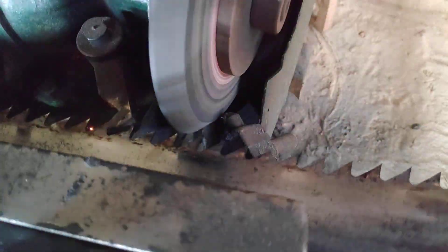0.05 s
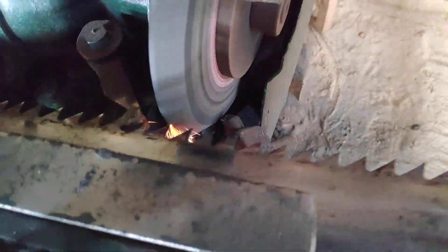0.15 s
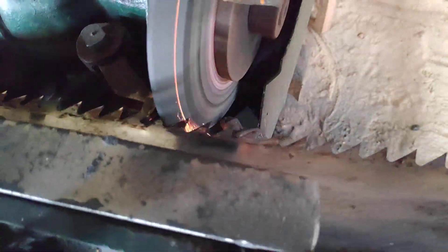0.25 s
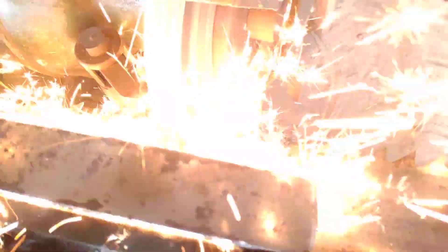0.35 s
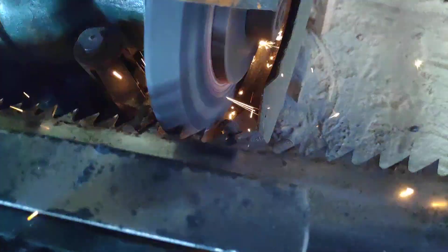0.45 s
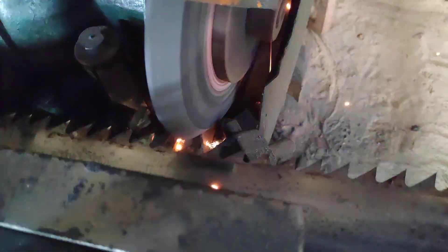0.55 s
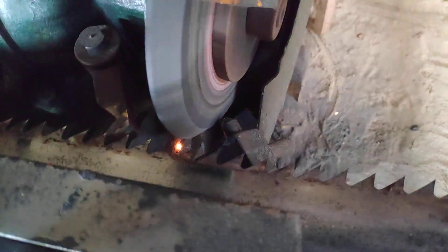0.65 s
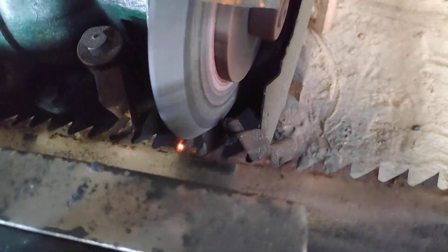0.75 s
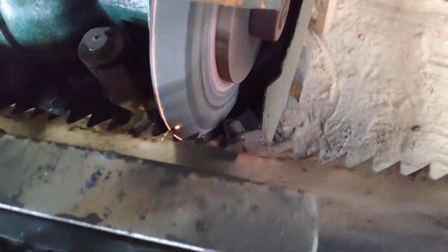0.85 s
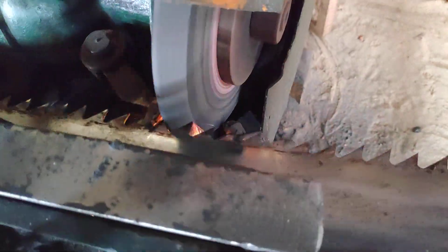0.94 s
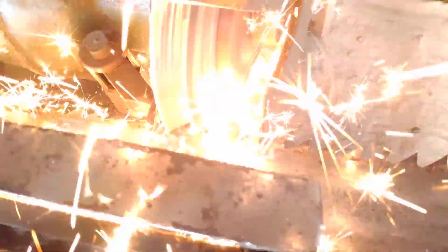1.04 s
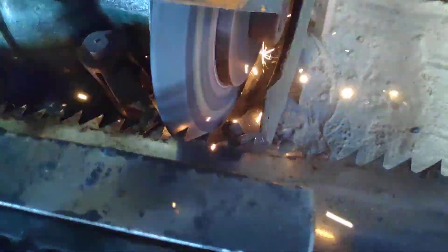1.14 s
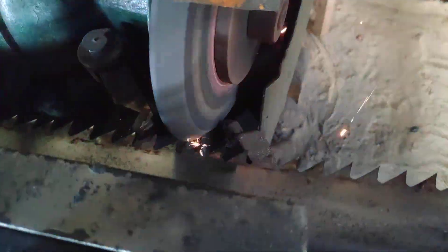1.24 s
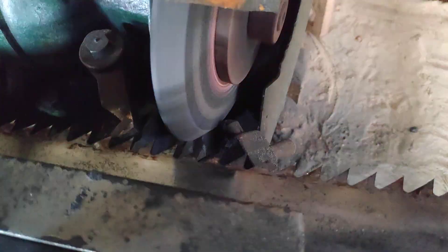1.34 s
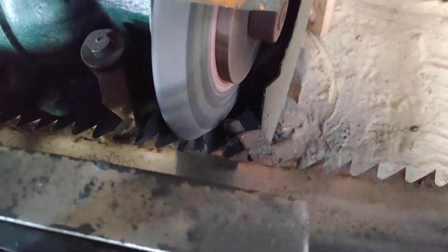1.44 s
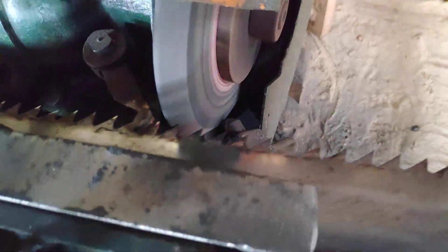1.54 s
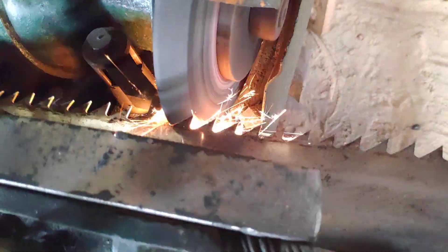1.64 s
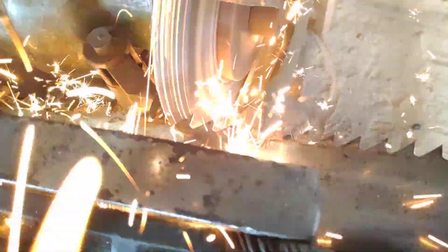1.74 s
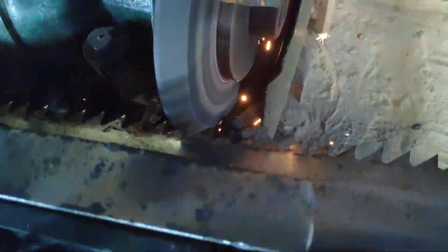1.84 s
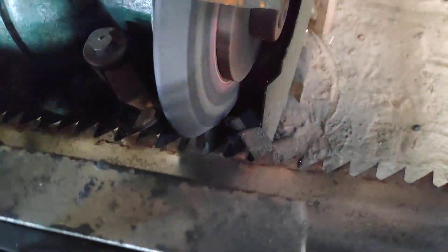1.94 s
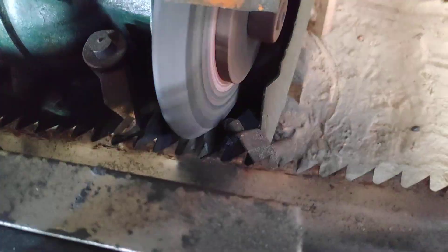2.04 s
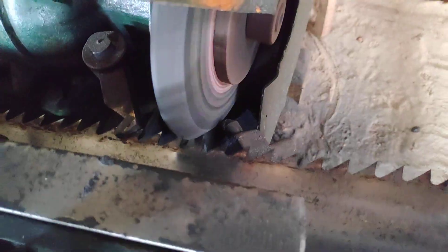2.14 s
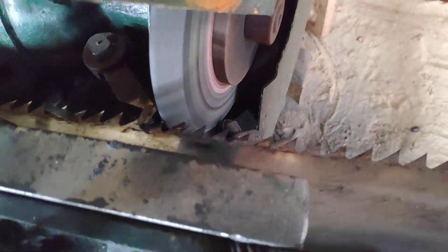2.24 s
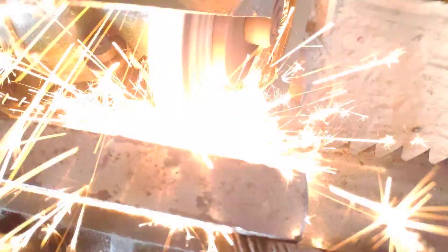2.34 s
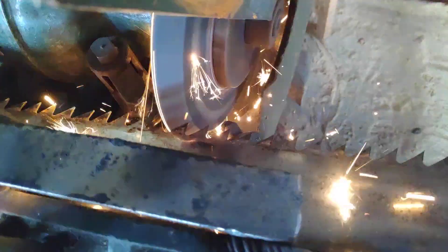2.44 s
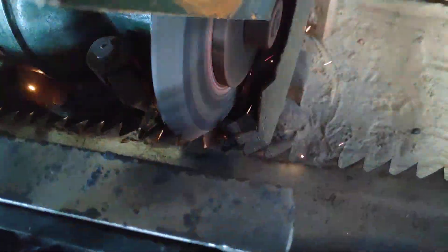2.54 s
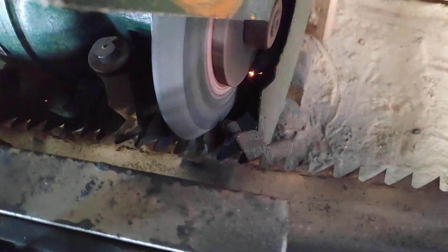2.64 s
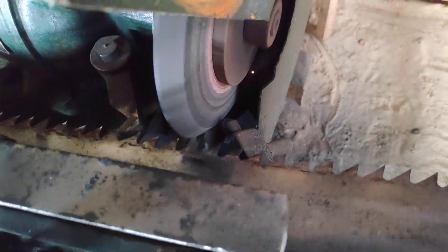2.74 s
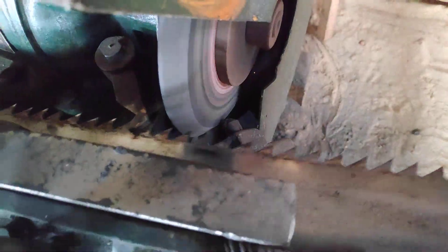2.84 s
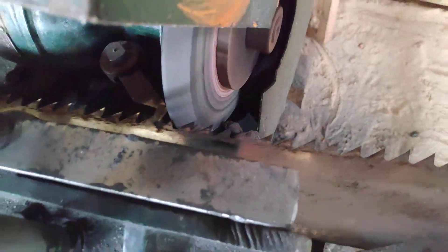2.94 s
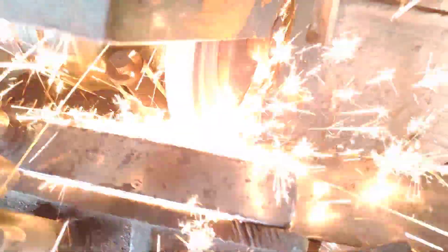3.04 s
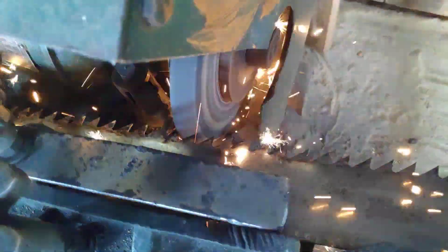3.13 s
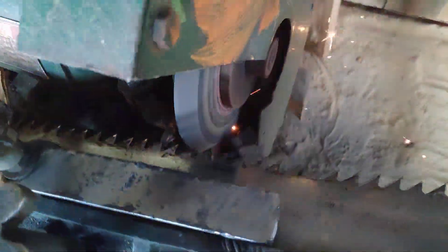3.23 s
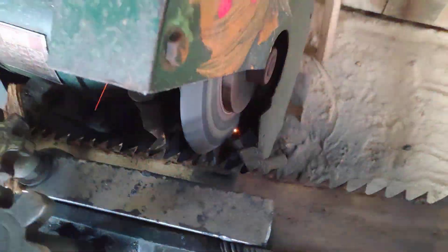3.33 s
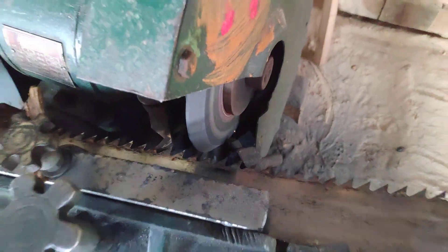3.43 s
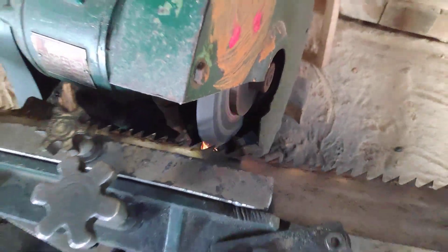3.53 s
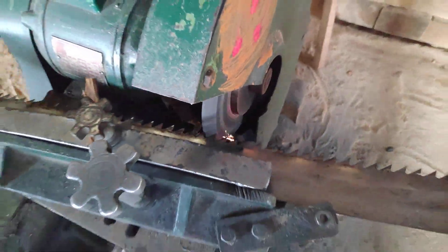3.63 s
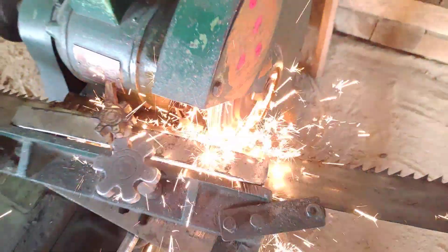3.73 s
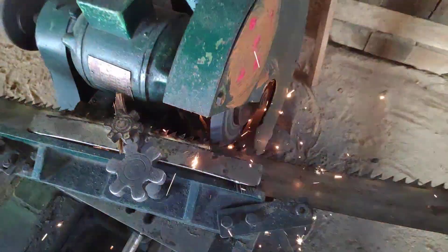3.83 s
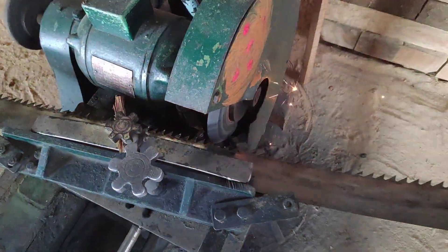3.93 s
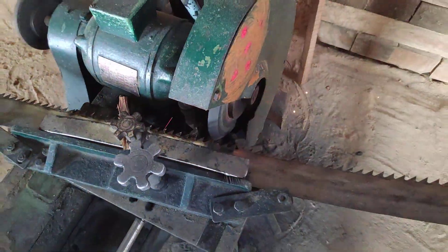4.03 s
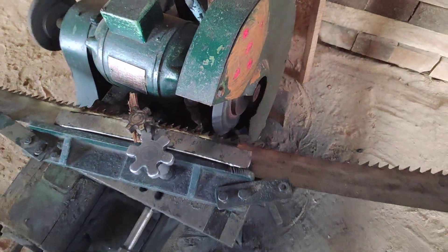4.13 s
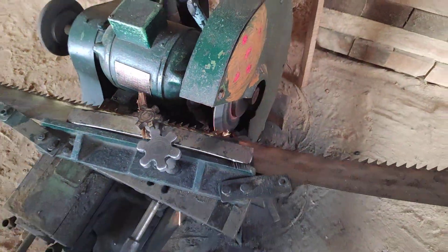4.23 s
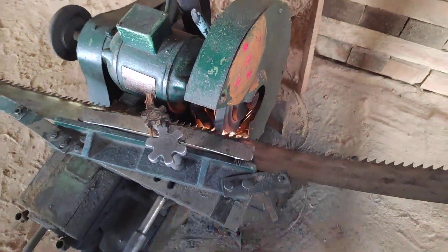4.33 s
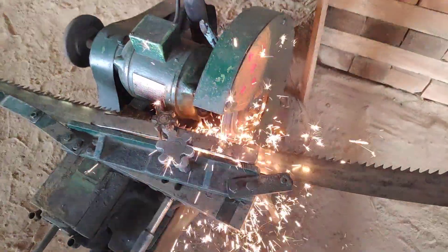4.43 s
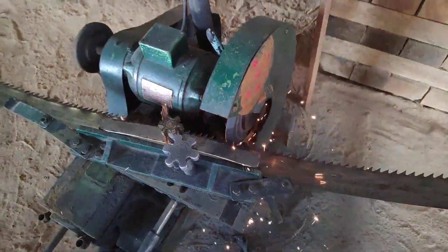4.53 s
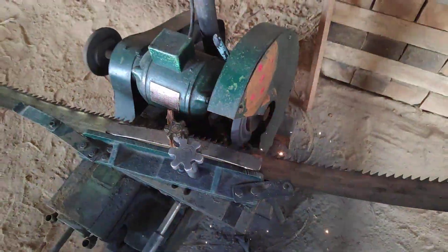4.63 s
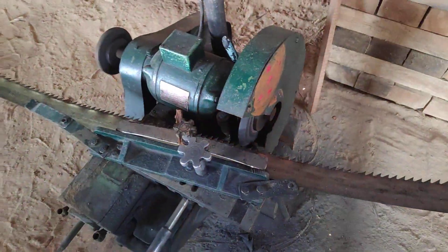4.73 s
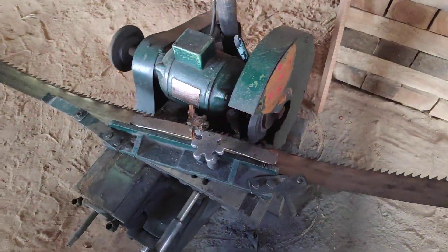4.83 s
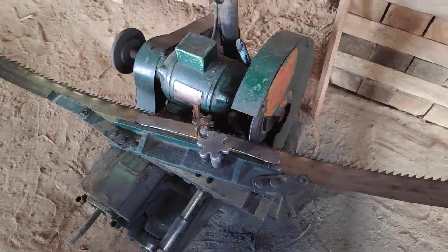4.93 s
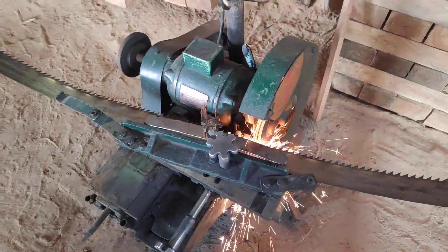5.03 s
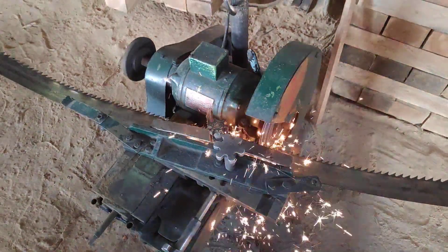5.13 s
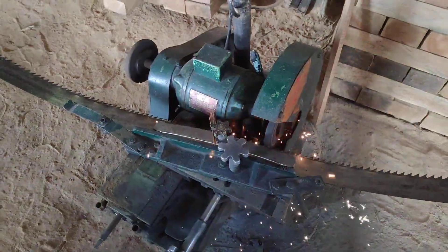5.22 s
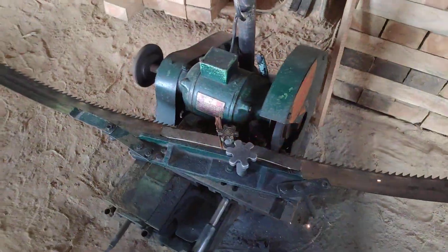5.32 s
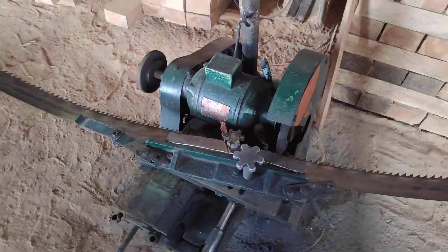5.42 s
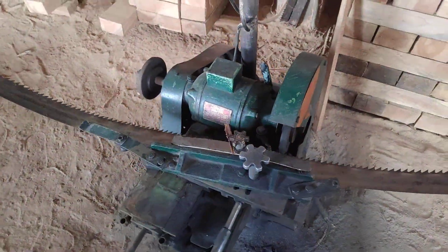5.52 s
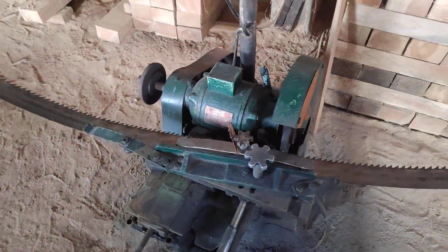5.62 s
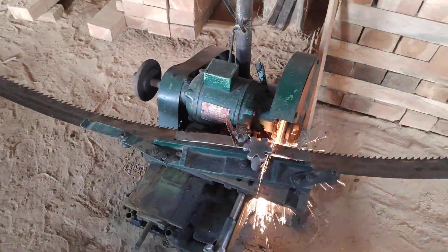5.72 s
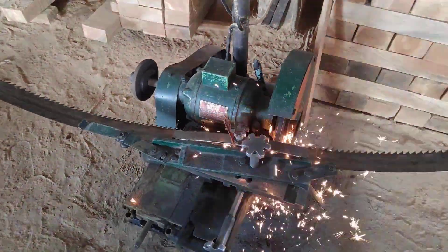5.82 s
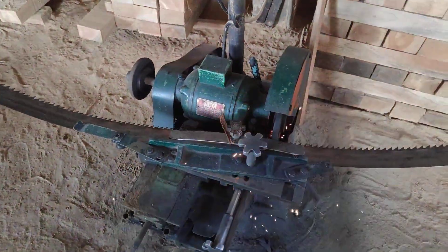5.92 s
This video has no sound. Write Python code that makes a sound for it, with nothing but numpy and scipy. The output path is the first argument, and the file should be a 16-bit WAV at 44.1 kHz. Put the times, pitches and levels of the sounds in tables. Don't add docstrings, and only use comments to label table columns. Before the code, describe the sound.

A grinding machine works tooth by tooth: bright steel clack, small clamp ticks, a tearing burst of abrasive noise, a dull brief echo, faint singing steel, then another click. Motor hum and rattling gears continue underneath. The phone's stereo image shifts as it retreats and turns; sound is close, rough and clipped, with ducked gain and low thumpy baseline swings, growing somewhat quieter.

```python
import sys
import numpy as np
from scipy import signal
from scipy.fft import rfft, irfft, next_fast_len
from scipy.io import wavfile
from scipy.ndimage import uniform_filter1d

SR = 44100
rng = np.random.default_rng(int(sys.argv[2]) if len(sys.argv) > 2 else 0)


def digitize_waveform(pressure):
    field = np.atleast_2d(pressure).T
    bounded = np.clip(field, -1, 1)
    quanta = np.round(bounded * 32767).astype(np.int16)
    wavfile.write(sys.argv[1], SR, quanta)


def nominal_scale(level):
    x = np.asarray(level, float) / 20
    return 10 ** x


N = 263277
T = np.arange(N) / SR
F = np.maximum(np.fft.rfftfreq(next_fast_len(N), 1 / SR), 1)

# [t/s, hiss level/dB, deepest cut after/s, contact/s, left port load/dB]
BITES = [
    (0.338, -4.5, 0.038, 0.085, -5),
    (1.018, -3.5, 0.029, 0.082, -2.5),
    (1.694, -2, 0.038, 0.085, -6.5),
    (2.371, -4.5, 0.035, 0.08, -4.5),
    (3.047, -6, 0.024, 0.08, -3),
    (3.729, -4, 0.038, 0.07, -3.5),
    (4.409, -6, 0.029, 0.067, -5),
    (5.084, -6.5, .04, 0.084, -32),
    (5.765, -8, .05, 0.083, -40),
]
# [t/s, distance loss/dB, left port aim/dB, left minus right/dB]
PHONE = [(0.0, -0.8, -0.5, -5), (.8, -1.7, 0.5, -5.5), (1.6, -2.4, -2.7, 0.5), (2.4, -2.8, -0.9, -5),
         (3.3, -3.5, -4.5, -4), (4.3, -4, -3.5, -4), (4.5, -3.5, -10, -13.5), (4.92, -4.5, -7.5, 0.1),
         (5.15, -4, -8, -5), (5.6, -5, -12, -3), (5.97, -5, -3.5, -11)]


def filtered(x, gain):
    size = next_fast_len(N)
    return irfft(rfft(x, size) * gain, size)[..., :N]


def colour(x, points):
    hz, db = np.transpose(points)
    y = filtered(x, nominal_scale(np.interp(np.log(F), np.log(hz), db, left=-60, right=-60)))
    return y / y.std()


def resonate(x, peaks):
    y = filtered(x, sum(nominal_scale(db) / (1 + 1j * (F - hz) / (width / 2)) for hz, width, db in peaks))
    return y / y.std()


def notched(x):
    # [f/Hz, width/Hz, depth 0-1]
    notches = [(2750, 260, .8), (3300, 200, .4), (5000, 240, .8)]
    gain = np.ones(len(F))
    for hz, width, depth in notches:
        gain = gain * (1 - depth / (1 + ((F - hz) / width) ** 2))
    return filtered(x, gain)


def walk(rate_hz):
    k = int(SR / rate_hz)
    held = np.repeat(rng.standard_normal((2, N // k + 1)), k, axis=1)
    return 2.32 * uniform_filter1d(held, k)[:, :N]


def pair(alike, grain_db=0.):
    alike = np.clip(alike, 0, 1)
    x = rng.standard_normal((3, N)) * nominal_scale(grain_db * rng.exponential(size=N))
    return np.sqrt(alike) * x[0] + np.sqrt(1 - alike) * x[1:]


def sides(pan_db):
    return nominal_scale(np.array([pan_db, -pan_db]) / 2)


def curves(table, at=T):
    s, *columns = np.transpose(table)
    return [np.interp(at, s, c) for c in columns]


def after_bite():
    cam_turn_s = .6785
    starts = np.array([BITES[0][0] - cam_turn_s] + [bite[0] for bite in BITES])
    return T - starts[np.searchsorted(starts, T) - 1]


def bite_lines():
    lift_s, echo_s, port_stop_s = 0.047, 0.14, 0.02
    lines = np.array([-90., 0, 0, 0])[:, None] + np.zeros(N)
    for s, db, deep_s, contact_s, load_db in BITES:
        at = s + np.array([0, deep_s, contact_s, contact_s + lift_s, contact_s + echo_s])
        on = (T >= s) & (T <= at[-1])
        lifted = np.clip((T[on] - at[2]) / port_stop_s, 0, 1)
        lines[0, on] = db + np.interp(T[on], at, [-4.5, 0, -3, -17.5, -35])
        lines[1, on] = load_db - 4.5 * lifted
        lines[2, on] = -9 + .6 * load_db + np.interp(T[on], at, [-7, 0, -6, -52, -3])
        lines[3, on] = np.interp(T[on], at, [-1.1, 4, 1.1, -1.1, 0])
    return lines


def grinding():
    # [f/Hz, level/dB per Hz]
    grit_hiss = [(710, -13), (1200, -16.5), (2390, 1.5), (3820, 9.5), (4280, -16), (5010, 9), (5560, 3),
                 (7680, 6), (9760, 0), (12800, 2), (14500, -6.5)]
    # [f/Hz, width/Hz, level/dB]
    cavity = [(3350, 260, -5), (3750, 330, 0), (4130, 300, -1)]
    wheel_turn_hz, echo_dull_hz = 48.4, 9800
    shadow_hz, shadow_width_hz = 3510, 470
    hiss_db, port_db, rumble_db, pan_db = bite_lines()
    lifted = np.clip((after_bite() - .1) / 0.017, 0, 1)
    pulse = 0.81 * np.sin(2 * np.pi * wheel_turn_hz * T)
    grit = pair(0.17, grain_db=2.0) * nominal_scale(pulse + 0.9 * walk(150))

    hiss = nominal_scale(-1.5) * notched(colour(grit, grit_hiss))
    treble = signal.sosfilt(signal.butter(2, echo_dull_hz, "high", fs=SR, output="sos"), hiss)
    hiss = hiss - .8 * lifted * treble
    shadow = filtered(hiss, np.exp(-((F - shadow_hz) / shadow_width_hz) ** 2))
    hiss = hiss - np.clip((-port_db - 12) / 15, 0, .6) * shadow

    port = nominal_scale(port_db) * notched(resonate(grit, cavity)) * nominal_scale(np.array([[5], [-12]]))
    rumble = colour(pair(0.33, grain_db=2.5), [(25, -1), (60, 6.5), (150, -1.0), (600, -5.5), (1400, -9.5)])
    rumble = nominal_scale(rumble_db + 1.83 * walk(40)) * rumble * nominal_scale(np.array([[5], [-10]]))
    return nominal_scale(hiss_db) * (sides(pan_db) * hiss + port + rumble)


def clicks():
    # [t/s, peak level/dB, left minus right/dB, brightest f/Hz]
    resets = [
        (0.0034, -2.5, -8, 4300),
        (0.676, 1, -6, 3760),
        (1.36, -3, -4, 4140),
        (2.0302, -0.5, -3, 4300),
        (2.7097, -1, -6, 4200),
        (3.3824, -2, -1, 3960),
        (4.064, -5.5, 3.9, 3800),
        (4.746, -5, 11, 3970),
        (5.424, -6.5, 3.9, 4000),
    ]
    feeds = [
        (0.2333, 2, 3, 10500),
        (0.909, -0.5, 0, 10400),
        (1.5876, -1, 1, 5900),
        (2.265, 4.5, 0, 10700),
        (2.9425, 1.5, 4, 10800),
        (3.6204, 2, -6, 9200),
        (4.301, 0, 2, 7660),
        (4.9772, 1.5, -1, 11000),
        (5.6555, 4.5, -1, 9900),
    ]
    clamps = [(0.2195, -7, 4, 3900), (0.932, -9, -6, 8300), (4.636, -10.5, 1.1, 2200),
              (0.3062, -4, 2.1, 3840), (0.327, -12, 3.9, 4020), (0.901, -8, 3.9, 4120),
              (0.989, -7.5, -1, 5380), (1.006, -4, -6, 3630), (1.688, -7, 1, 3600), (2.3485, -9, 3.9, 3830),
              (2.372, -25, 3.9, 3570), (3.708, -7, 1.1, 11500), (3.7216, -7, 3.9, 3920),
              (4.402, -6, 3.9, 4040), (5.07, -3.5, 3.9, 8350), (5.73, -7.5, 3, 8700),
              (5.752, -1, 3.9, 8070), (5.766, -5, -2, 10200)]
    # [length/s, gain duck/dB, recovery/s]
    strokes = [
        (0.0037, 4, 0.14),
        (0.0045, 16.5, 0.067),
        (0.0074, 5.5, 0.035),
    ]
    return [(*row, *stroke) for rows, stroke in zip((resets, feeds, clamps), strokes) for row in rows]


def pawl():
    bright_hz = 7000
    out = np.zeros((2, N))
    noise = colour(pair(0.076), [(1200, -24), (3000, 15.5), (5000, 14.5), (14000, 7)])
    jingle = resonate(noise, [(8100, 110, -6), (9160, 130, 0), (10600, 280, -7)]) * nominal_scale(3.0 * walk(110))
    body = filtered(noise, 1 / (1 + (F / bright_hz) ** 8))
    t = np.arange(int(.1 * SR)) / SR
    for s, db, pan_db, hz, length_s, duck_db, _ in clicks():
        i = int(s * SR)
        span = slice(i, i + len(t))
        aim_db = curves(PHONE, s)[1]
        lost = np.clip(-aim_db / 11, 0, 1) * (hz > bright_hz)
        part = noise[:, span] - lost * body[:, span]
        sos = signal.butter(1, [1.013 * hz, min(1.055 * hz, 20000)], "band", fs=SR, output="sos")
        hard = np.clip((duck_db / 11.5) ** 1.5, 0, 1)
        swell = np.clip(t / .0006, 0, 1) * (1 - .4 * hard * np.exp(-t / .002))
        shape = swell * np.exp(-(t / max(length_s, 1e-3)) ** (1.6 + 3 * hard))
        scrape = shape * (part + 2.55 * signal.sosfilt(sos, part))
        after = .04 * hard * np.exp(-(t / .05) ** 2) * jingle[:, span]
        out[:, span] += nominal_scale(db - 10.0) * sides(np.clip(pan_db, -4, 4))[:, None] * (scrape + after)
    return out


def grazing():
    # [stop t/s, blade mode f/Hz, its level/dB, 5 kHz ring/dB, 9 kHz ring/dB]
    grazes = [
        (0.681, 2250, -27.5, -34, -33),
        (1.373, 2350, -30.5, -31, -32),
        (2.046, 2260, -24.5, -42, -35),
        (2.727, 2300, -26.5, -38, -35),
        (3.395, 2246, -28, -29.5, -35),
        (4.077, 2310, -28.5, -25.5, -43),
        (4.74, 2170, -26.5, -23, -48),
        (5.435, 2170, -29.5, -25, -44),
        (6.1, 2230, -30.5, -22, -46),
    ]
    squeak = (5.64, 2340, -25, -50, -60)
    # [f/Hz, width/Hz, level/dB]
    low_modes = [(5350, 70, 0), (5520, 60, -5)]
    high_modes = [(9150, 60, -3), (9500, 70, 0), (8740, 40, -7)]
    graze_s, squeak_s = .265, .05
    rub = pair(.4, grain_db=1.5) * nominal_scale(1.2 * walk(50))
    low_ring, high_ring = resonate(rub, low_modes), resonate(rub, high_modes)
    out = np.zeros((2, N))
    for length_s, row in [(graze_s, row) for row in grazes] + [(squeak_s, squeak)]:
        end, hz, blade_db, low_db, high_db = row
        s = end - length_s
        on = (T > s) & (T < end)
        fade = (T[on] - s) / (end - s)
        blade = resonate(rub, [(hz, 82, 0)])[:, on] * nominal_scale(blade_db - 3.0 * fade) * np.clip(fade / 0.32, 0, 1)
        out[:, on] = blade * sides(-3.0)[:, None] + low_ring[:, on] * nominal_scale(low_db - 1.5 - 9 * fade)
        out[:, on] += high_ring[:, on] * nominal_scale(high_db + 11 - 13 * fade) * sides(4.0)[:, None]
    return out


def whirr(duck_db):
    # [t after bite/s, gear rattle/dB, guard plate/dB, left minus right/dB]
    cam = [
        (0, -36, -8, -1),
        (.05, -45, 13, -10),
        (.13, -38, -47, -15),
        (.29, -26, -6, 0.5),
        (.39, -28.5, -7.5, 3),
        (.51, -28.5, -11, 6),
        (.59, -32.5, -17, -18.5),
        (.68, -36.5, 7, -9),
    ]
    # [f/Hz, level/dB]
    motor = [(386, -38), (1423, -47), (1599, -40), (1775, -47), (1913, -41), (2256, -42)]
    # [f/Hz, level/dB per Hz]
    housing_points = [(15, -33), (25, 0), (48, -22), (76, -18), (205, -4.5), (318, -7), (383, -1.5),
                      (416, -12.5), (874, -9), (1020, -25.5), (1400, -36), (1820, -17), (3080, -120)]
    air_points = [(1410, -14), (2400, 0.5), (3220, -0.5), (4000, -21), (4380, -9.5), (4910, 8.5),
                  (5660, -1.5), (9370, -10.5), (10200, -19), (12600, -11.5), (14500, -21)]
    # [f/Hz, width/Hz, level/dB]
    hum = [(88.6, 9.4, -5.5), (118, 4.9, -6), (209, 16.7, -10), (469, 84, -12)]
    gear_body = [(1470, 17.5, -1.5), (1762, 93, -6.5), (1896, 50, -0.5), (2130, 1000, -17)]
    plate_hz, plate_width_hz, idle_port_hz = 1594, 28, 3996
    spray_s, spray_db, port_dip_db = 0.18, 5.5, -5.5
    motor_fade_db_per_s = -3

    far_db, aim_db, pan_db = curves(PHONE)
    since = after_bite()
    gear_db, plate_db, gear_pan_db = curves(cam, since)
    dust = np.exp(-(since / spray_s) ** 2)
    housing_db = -32.5 + far_db
    gear_db = gear_db + 1.28 * far_db + .9 * walk(9)
    port_db = -24.5 + aim_db + port_dip_db * dust
    air_db = -27 + (spray_db - 0.46 * aim_db) * dust
    plate_db = plate_db + 0.72 * aim_db

    tones = np.zeros((2, N))
    for hz, db in motor:
        level = nominal_scale(db + 11.0 + 2.0 * walk(14))
        tones += level * np.sin(2 * np.pi * hz * T + 0.44 * walk(12))
    shake = pair(.6)
    housing = colour(shake, housing_points) + nominal_scale(-5 + 0.83 * walk(3.96)) * resonate(shake, hum)
    low = nominal_scale(housing_db + 4.5 + 0.3 * walk(7.8)) * housing + tones * nominal_scale(motor_fade_db_per_s * T)

    knock = pair(.4, grain_db=1.5) * nominal_scale(1.6 * walk(60))
    plate = nominal_scale(plate_db) * resonate(knock, [(plate_hz, plate_width_hz, 0)]) * sides(-19.5)[:, None]
    gears = nominal_scale(gear_db + 3.5) * (sides(gear_pan_db) * resonate(knock, gear_body) + plate)

    port = nominal_scale(port_db + 1.1 * walk(30)) * resonate(pair(0.23), [(idle_port_hz, 320, 0)])
    port = port * nominal_scale(np.array([[4], [-8]]))
    air = notched(colour(pair(0.05, grain_db=1.5), air_points))
    air = nominal_scale(air_db + 5 + 0.7 * walk(20)) * air * sides(pan_db)
    left_right = np.array([[1.1], [.7]])
    return low * nominal_scale(duck_db) + gears * nominal_scale(0.66 * duck_db) + (port + air) * nominal_scale(0.59 * left_right * duck_db)


def ducking():
    ease_per_s = 0.15
    hits = [(s + 0.0022, duck_db * (1.15 - ease_per_s * s), back_s)
            for s, _, _, _, _, duck_db, back_s in clicks()]
    hits += [(bite[0] + .05, 15 + 1.8 * (bite[1] + 7), .15) for bite in BITES]
    coarse = T[::16]
    loss = np.zeros(len(coarse))
    for s, db, back_s in hits:
        loss += db * (coarse > s) * np.exp(-(np.abs(coarse - s) / back_s) ** 1.7)
    return -np.interp(T, coarse, loss)


def bump(at_s, width_s):
    return np.exp(-((T - at_s) / width_s) ** 2)


def baseline():
    # [dip t/s, left depth, right depth, width/s]
    swings = [
        (.38, 0.058, 0, 0.033),
        (1.17, 0.048, 0.62, 0.051),
        (1.3, 0.25, 0.18, 0.09),
        (1.73, 0.079, 0.23, 0.011),
        (1.94, 0.072, 0.48, 0.098),
        (2.551, 0.64, 0.0071, 0.043),
        (3.253, 0.51, 0, 0.059),
        (3.94, 0.45, 0.0032, 0.066),
        (5.35, 0.14, 0, 0.093),
    ]
    out = np.zeros((2, N))
    for s, left, right, width in swings:
        swing = 0.49 * bump(s - 2.04 * width, .5 * width) - bump(s, width) + 0.35 * bump(s + 0.18, 0.16)
        out += np.array([[left], [right]]) * swing
    return out


def scene():
    return grinding() + grazing() + pawl() + whirr(ducking()) + baseline()


def roll_off(x):
    return signal.sosfilt(signal.butter(12, 14890, fs=SR, output="sos"), x)


def record(dry):
    # [f/Hz, left minus right/dB]
    port_tilt = [(25, -1.5), (2500, 2), (5000, 3.5), (7800, -5.5), (10000, 3.5), (14300, 12), (20000, 0)]
    twist_rad, ripple_hz = 2.4, 2900
    full_scale, top_hz = .89, 14350
    hz, db = np.transpose(port_tilt)
    twist = twist_rad * (1 - np.cos(2 * np.pi * F / ripple_hz)) * np.sin((F / 2600) ** 1.6)
    ports = sides(np.interp(np.log(F), np.log(hz), db)) * np.exp(.5j * np.array([twist, -twist]))
    flat = np.clip(filtered(dry, ports), -full_scale, full_scale)
    top = signal.ellip(8, .3, 40, top_hz, fs=SR, output="sos")
    return roll_off(signal.sosfilt(top, flat))


dry = scene()
out = record(dry)
digitize_waveform(out)
```